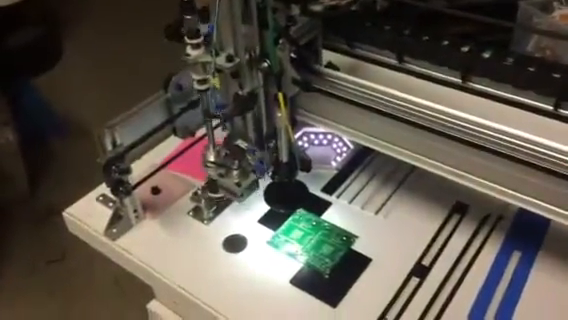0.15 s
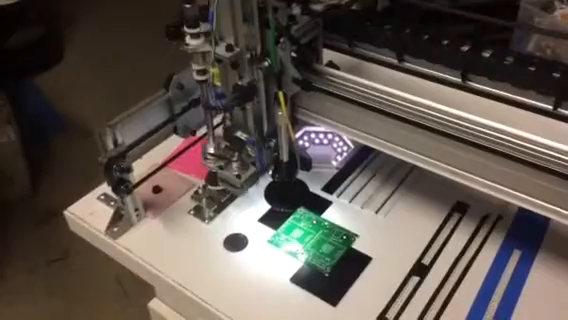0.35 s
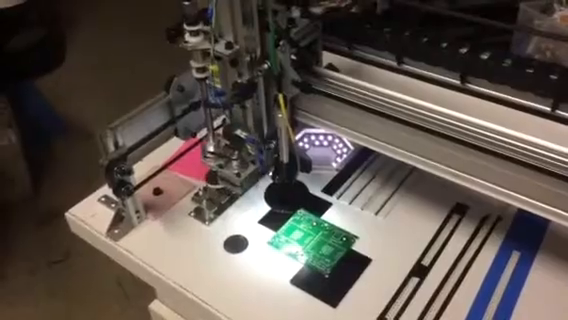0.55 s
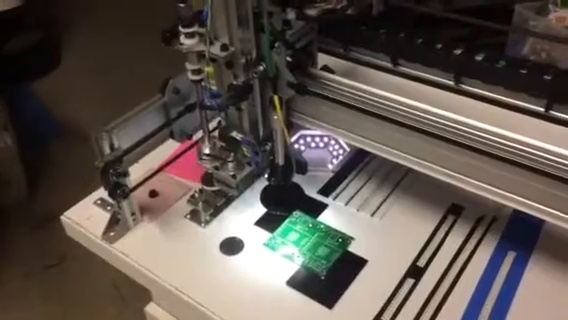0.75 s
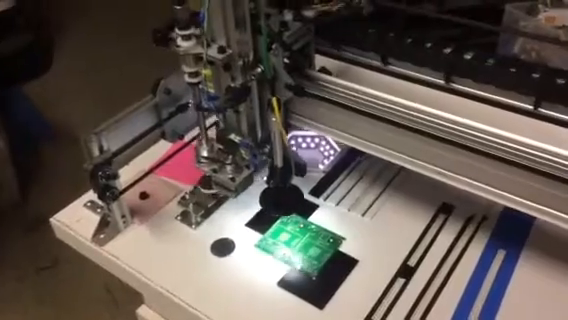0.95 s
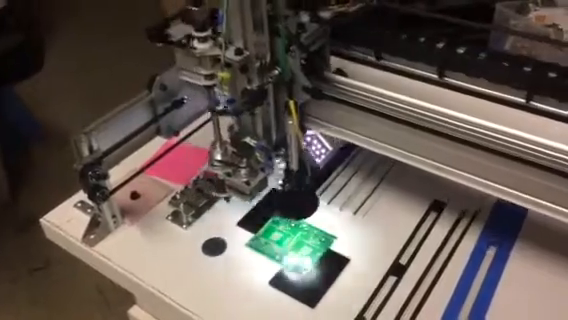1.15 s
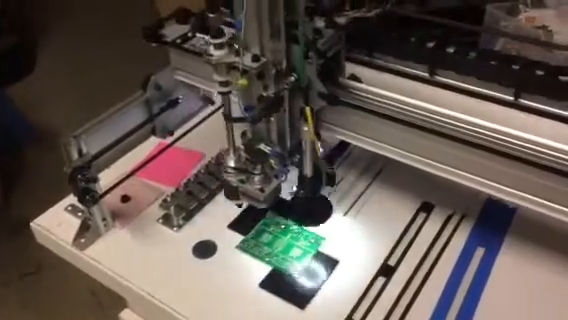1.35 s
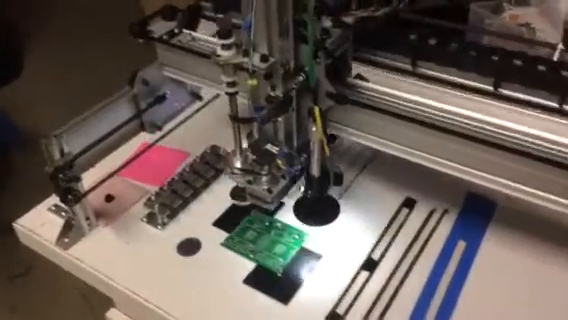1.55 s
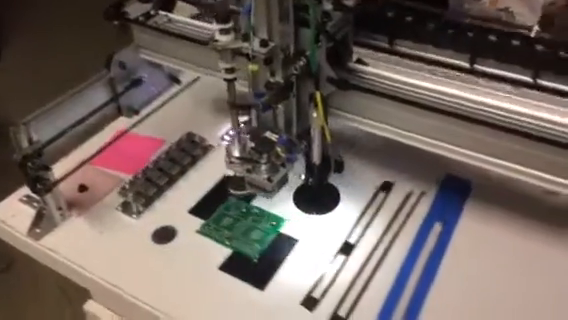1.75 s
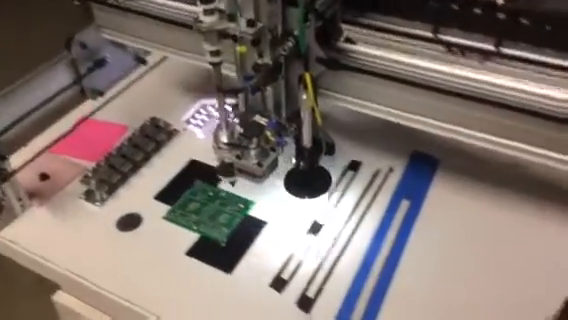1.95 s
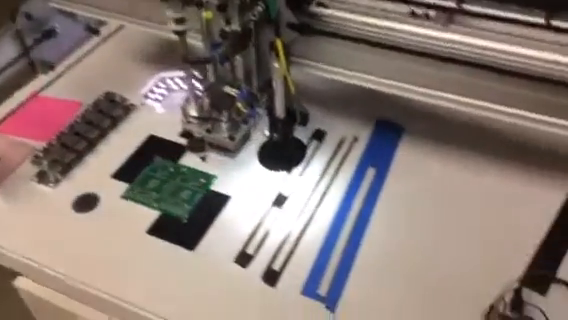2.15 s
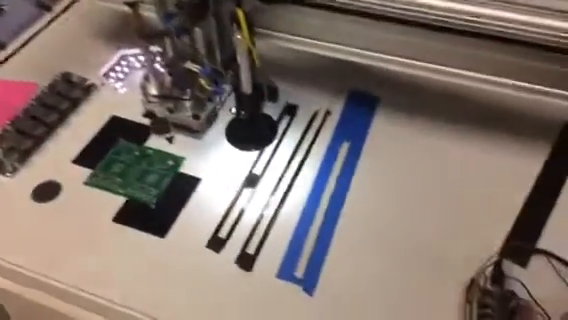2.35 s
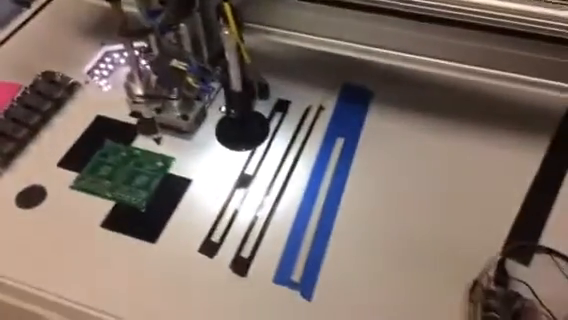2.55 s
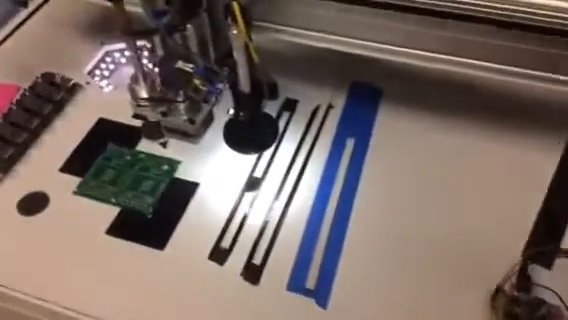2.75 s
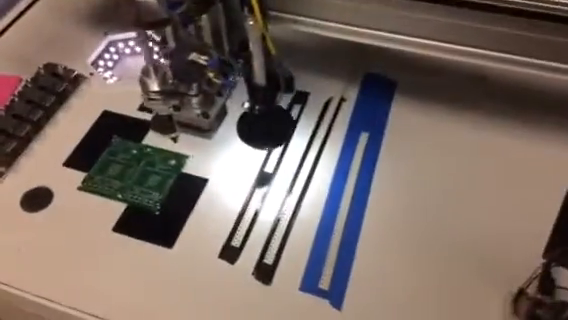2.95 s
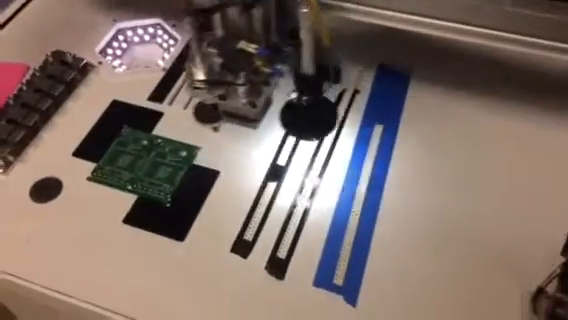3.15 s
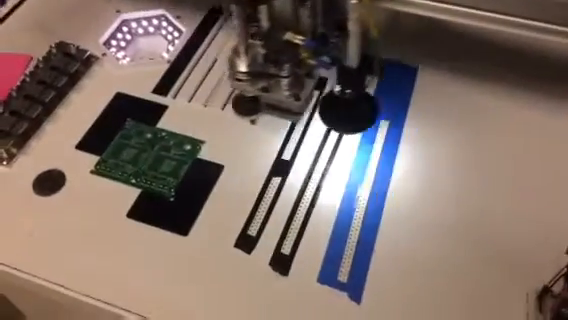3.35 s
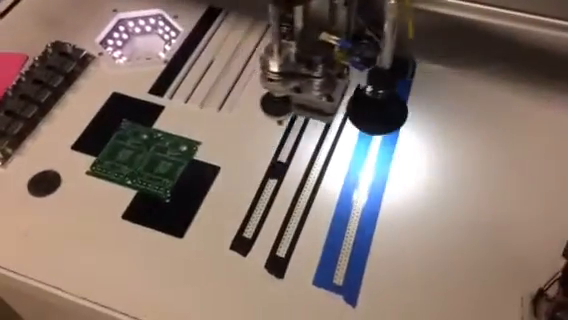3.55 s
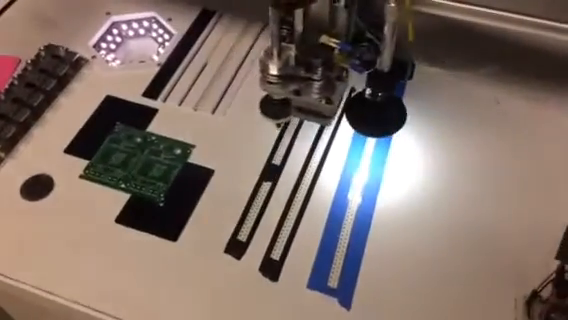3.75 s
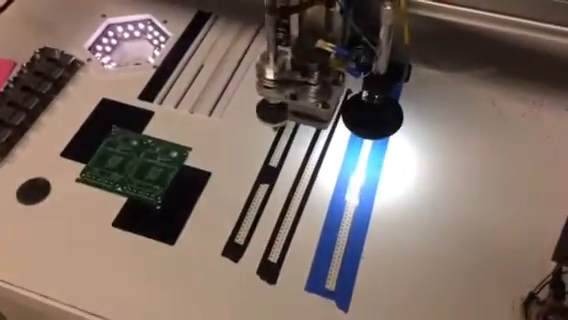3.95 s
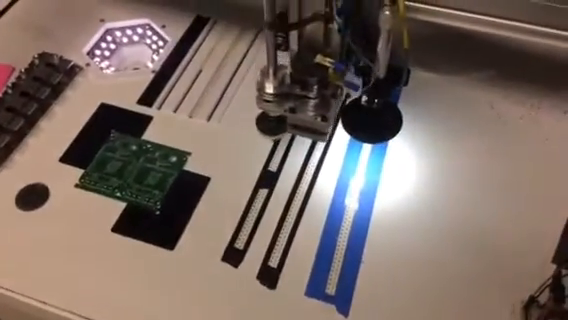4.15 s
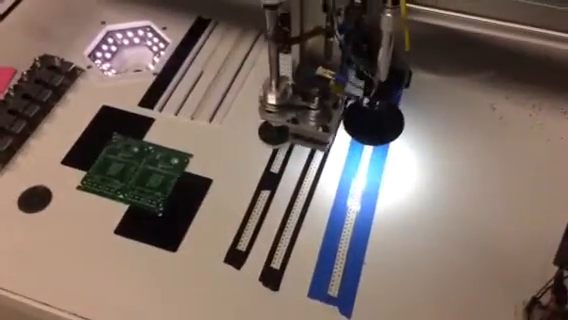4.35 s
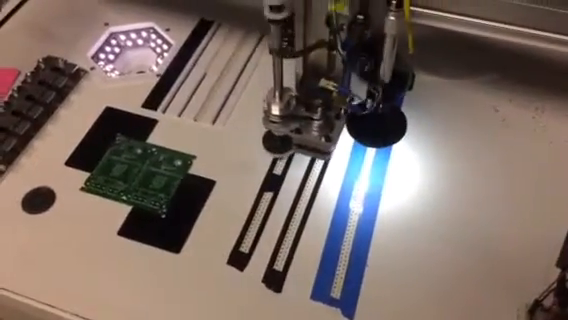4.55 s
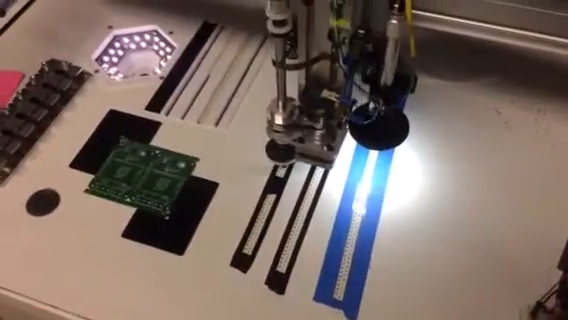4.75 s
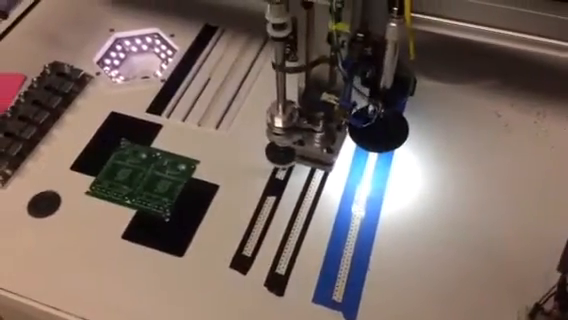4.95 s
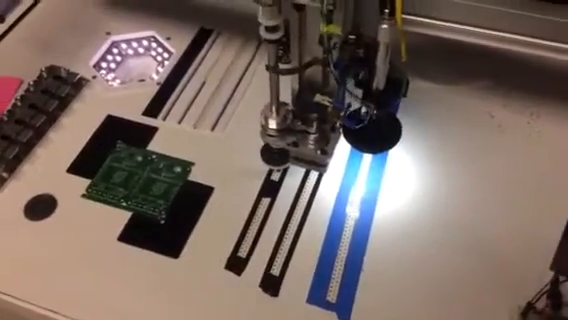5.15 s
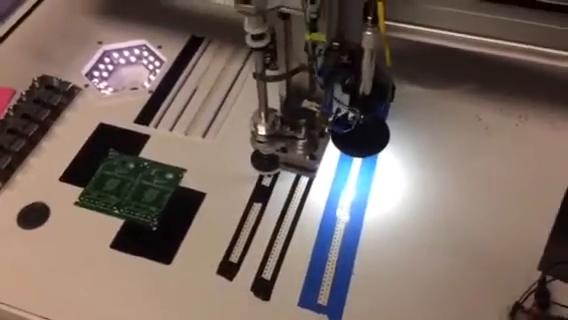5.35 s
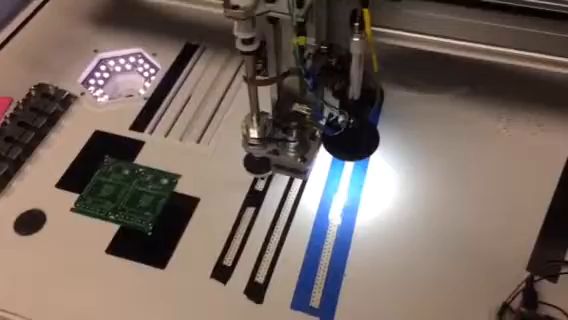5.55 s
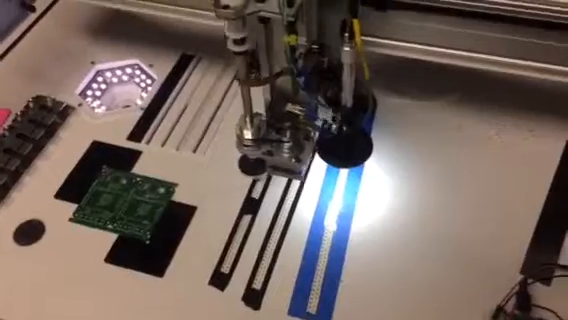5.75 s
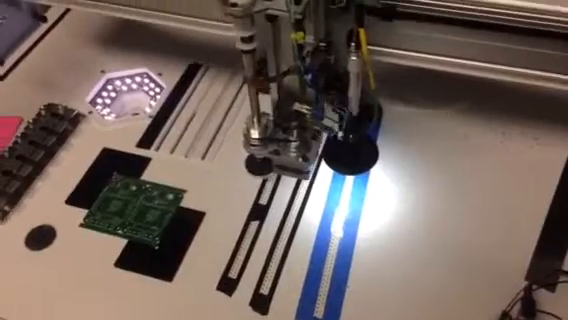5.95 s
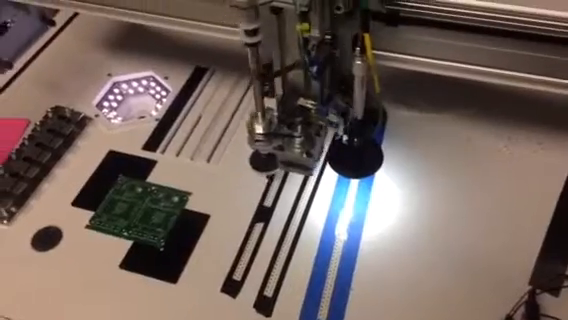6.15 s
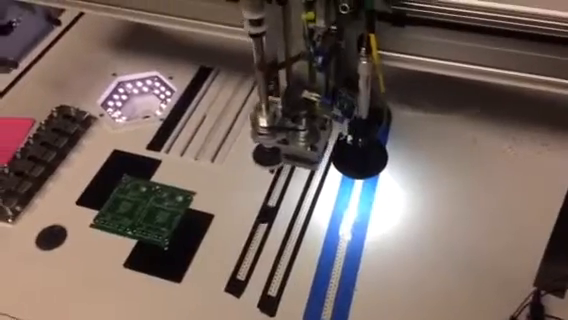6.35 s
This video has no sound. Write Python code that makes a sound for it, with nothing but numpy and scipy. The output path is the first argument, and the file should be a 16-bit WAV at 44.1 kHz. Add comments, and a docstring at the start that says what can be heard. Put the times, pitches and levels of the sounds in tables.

```python
"""Thin electronic whistles over a low room hum, then a pick-and-place machine starts to move.
Its lift and gantry speed up, cruise and brake: motor overtones sing through the frame, with knocks and noise.
Belts drone and motor drivers whistle; late on, a valve snaps, air escapes and a small vacuum pump purrs.
Tones are sums of sine waves; knocks and noise are shaped by resonances or by broad outlines."""
import sys
import numpy as np
from scipy import signal
from scipy.fft import rfft, irfft, next_fast_len
from scipy.io import wavfile
from scipy.ndimage import uniform_filter1d

SR = 44100
rng = np.random.default_rng(int(sys.argv[2]) if len(sys.argv) > 2 else 0)


def dump_mix(stems):
    """Bounce the given channels to the path in sys.argv[1] as a 16-bit WAV at rate SR."""
    frames = np.atleast_2d(stems).T  # one column per channel
    limited = np.clip(frames, -1, 1)  # hard clip at full scale
    pcm = np.round(limited * 32767).astype(np.int16)
    wavfile.write(sys.argv[1], SR, pcm)


N = 286209
T = np.arange(N) / SR  # time of every sample, in seconds

# Motor overtones, before each move's own trims: multiple of step rate (to the nearest quarter),
# level_db at speed, level_db on braking, extra_db under ramp load
LIFT = [(1, -56, -57, 3), (2, -68, -69.5, 3), (3, -70.5, -71.5, -24), (4, -61, -61, -8),
        (5, -66.5, -66.5, -16), (6, -64.5, -61.5, -26), (7, -66, -64, -19), (9, -70, -71, -1.5)]
BRIDGE_A = [(1, -41.5, -39, -5.5), (2, -65.5, -64, 4.5), (3, -74, -69, 16), (4, -84, -49, -4),
            (5, -64, -59, -3), (6, -65, -68, -3), (7, -74, -68, 1), (8, -73, -79, 5), (9, -71, -76, -7),
            (9.25, -74, -73, -23), (9.75, -72, -65, -25), (10.75, -80, -72, -27)]
BRIDGE_B = [(1, -48.5, -43, 0.5), (2, -57.5, -74, -10), (3, -66.5, -65.5, 15.5), (3.25, -59, -70, -16),
            (4, -48, -52.5, -4), (5, -50.5, -62, -17), (6, -59, -66, -12), (7, -67, -66, 4.5),
            (8, -68.5, -76, 0), (9.25, -72, -78, -22), (9.75, -74, -68, -14), (10.75, -72, -80, -13)]
HEAD_A = [(2, -60, -62.5, -6), (5, -70, -78, -11), (5.75, -68, -74, -12), (7, -53.5, -63, -16),
          (8, -60.5, -62, 5.5), (18.2, -73, -64.5, -11), (25.9, -66.5, -70.5, -2)]
HEAD_B = [(1, -70, -69.5, -19), (2, -45, -52.5, 0), (3, -50.5, -51, -21), (4, -60, -64.5, 5),
          (6, -66, -62, -2), (7, -55, -60.5, -21), (8, -52, -55, -0.5), (15, -65, -59, 0),
          (16, -71, -74, -18)]
# Sharp resonances of the gantry frame and of the lift: pitch_hz, width_hz, gain_db
FRAME = [(1176, 108, 2.5), (1580, 72, 2), (4590, 140, -7), (4970, 30, -5), (5280, 62, 1), (6020, 290, -2.5),
         (5600, 130, -15), (6760, 52, -41), (7280, 64, -1.5), (6600, 35, -19), (7460, 37, -4),
         (8240, 94, -6.5), (12700, 110, -42), (14900, 240, -25)]
LIFT_FRAME = [(1067, 69, -1), (3386, 83, -2.5), (4830, 100, -6), (5300, 90, -14.5), (6400, 18, -27),
              (7200, 53, -3.5), (8120, 230, -7.5), (9040, 76, -7.5), (10700, 84, -15.5), (14600, 88, -17)]
RESONANCES = {"lift": LIFT_FRAME, "gantry": FRAME}  # part name: its resonances
# Broad outline under the sharp resonances: pitch_hz, gain_db
FRAME_BASE = [(300, -17), (1000, -8.5), (3000, -14.5), (6000, -11.5), (8800, -16.5), (10000, -30.5),
              (15000, -48)]
# Moves: part, start_s, stop_s, motors, shake_db (start jolt, cruise, stop jolt),
# rush_db and hiss_db (each: speeding up, cruise, braking, holding after).
# Each motor: step_rate_hz, overtones, tone_db, tilt_db per octave, body_db on 2nd to 4th overtone,
# knock_db starting, knock_db braking
MOVES = [("lift", .125, .655, [(1245.9, LIFT, -4.1, 0.1, 7, -61, -60)], (-55, -62, -56),
         (-55, -63, -53, -64), (-56, -66, -56, -72)),
         ("gantry", .92, 2.29, [(1329.6, BRIDGE_A, 0, 0, 0, -47.5, -52),
         (429.1, HEAD_A, 0, 0, 0, -56, -60)], (-36, -55, -41), (-43.5, -53.5, -42, -76),
         (-56, -58.5, -53, -77)), ("gantry", 2.99, 3.82, [(1329.6, BRIDGE_B, 0, 0, 0, -48.5, -49.5),
         (565.6, HEAD_B, 0, 0, 0, -50, -59)], (-38, -48, -38), (-41, -51, -43, -72),
         (-54, -57.5, -55, -77)), ("lift", 4.015, 4.92, [(1249.2, LIFT, 0.3, -0.3, -1.1, -60, -54)],
         (-56, -60.5, -55), (-49, -63, -47, -63), (-54, -65.5, -59, -66)),
         ("lift", 5.595, 6.502, [(1249.2, LIFT, -1.6, 1.3, -7, -56, -68)], (-60, -60, -57),
         (-47, -63, -48, -63), (-57, -62.5, -55, -65))]
# Time to reach speed, and to brake; part name: ramp_s
RAMP_S = {"lift": .105, "gantry": .2}
# Where strain noise peaks in a ramp; part name: share of the ramp's time (0 to 1), sharpness (exponent)
RUSH_PEAK = {"lift": (0.38, 1), "gantry": (0.49, 1.14)}
HISS_PEAK = {"lift": (0.57, 1), "gantry": (0.75, 0.43)}
# Low shaking resonances of the gantry: pitch_hz, width_hz, gain_db
GANTRY_SHAKE = [(195, 29.7, 4.5), (332.4, 67, 7.5), (389.8, 75, 4), (514, 310, -24)]
# Outline of the driver hiss: pitch_hz, relative level_db per Hz
DRIVER_HISS = [(1760, -40.5), (3000, 8), (3190, -34), (3330, -34), (3590, 10), (4790, -32), (5160, -32),
               (7330, 8), (9850, 5), (10300, 4.5), (15500, 0.5)]
# Belt drones: on_s, off_s, pitch_hz, width_hz, level_db (rms)
DRONES = [(0.88, 2.15, 323.2, 7.7, -52.5), (1.114, 2.198, 208, 12.5, -54), (1.69, 2.32, 402.3, 20, -56.5),
          (3.08, 3.816, 180, 8.1, -55.5), (3.13, 3.768, 401.7, 9.2, -48.5), (3.2, 3.8, 342.4, 24, -54.5),
          (4.14, 4.83, 320, 14, -62.5), (.25, 0.57, 400, 8.7, -67.5), (0.16, 0.67, 267.5, 11, -63)]
# Driver whistles: on_s, off_s, pitch_hz, average level_db (rms)
WHISTLES = [(-.1, 1.0, 5510, -65.5), (-.1, .95, 7362, -65.5), (-.1, 1.0, 12870, -70),
            (-.1, .13, 10940, -74), (.22, .58, 14637, -70), (1.12, 2.1, 7200, -60.5),
            (1.122, 2.1, 5460, -60.5), (1.12, 2.1, 5900, -68), (1.12, 2.1, 8650, -64.5),
            (3.81, 4.85, 8010, -76), (3.2, 3.62, 7170, -62), (3.2, 3.62, 7100, -72), (3.2, 3.62, 4807, -75),
            (3.827, 5.6, 5340, -70.5), (3.84, 6.6, 2666, -70.5), (4.1, 6.6, 7326, -74),
            (4.1, 4.83, 14680, -69.5), (4.933, 5.6, 7730, -58.5), (4.934, 5.6, 15068, -73),
            (4.93, 5.6, 11192, -75), (5.7, 6.4, 14800, -72), (5.7, 6.4, 8920, -81)]
# Two close tones: on_s, off_s, swells per second, time of one swell in s
BEAT = (1.14, 2.07, 3.45, 1.625)
# Pump knock overtones: multiple of turn rate, relative level_db
PUMP_ORDERS = [(3, -5), (4, -17.5), (5, -21.5), (6, -15), (7, -19.5), (8, -24), (9, -8.5), (10, -20),
               (11, -16), (12, -13), (13, -15.5), (14, -29), (15, -5.5), (16, -18), (17, -12), (18, -8),
               (19, -17), (20, -14), (21, -10), (22, -22), (23, -12.5), (24, -14.5), (25, -30), (26, -16.5),
               (27, -11.5), (28, -30), (29, -11.5), (30, -15.5), (31, -33), (32, -20), (33, -35), (34, -31),
               (35, -19), (36, -20)]
# Resonances of the pump's air: pitch_hz, width_hz, gain_db
PUMP_AIR = [(594, 550, -4), (1190, 1100, -1), (1990, 210, 1.5), (2660, 460, -10), (3980, 480, -4)]
# Valve strike and bounces: strike_s; and their peak level_db before the bass is removed
VALVE_S = [5.0491, 5.0496, 5.0508, 5.0652]
VALVE_DB = [1, -5.5, -17, -39]
# Ringing of the valve's steel: pitch_hz, relative level_db, t60_s (time to fade by 60 dB)
VALVE_MODES = [(3350, -15, 0.009), (5960, -20, 0.019), (7700, 1.5, 0.0077), (8470, -1.5, 0.0077),
               (11200, 8, 0.0073), (13000, 8, 0.0045)]
# Outline of the room hum: pitch_hz, relative level_db per Hz
HUM_OUTLINE = [(16, -39), (40, -9), (55, -1.5), (70, 4.5), (110, -3), (188, -15.5), (287, -33.5),
               (847, -25), (1260, -30.5), (1400, -28.5), (3090, -35), (3530, -30.5), (4600, -42.5),
               (7800, -44), (8900, -50), (14300, -55), (15500, -45)]

STILL_SHAKE_DB, FIRST_RUSH_DB, FIRST_HISS_DB = -66.5, -67, -69  # shake at rest; noise before the first move
JOLT_S, STOP_JOLT_LEAD_S = 0.033, 0.065  # rise of a jolt; the last one begins before the motor stops
VENT_DB, VENT_T60_S = -47, 0.24  # air escaping after the valve strikes
BEAT_HZ, BEAT_DB = 3990.5, -62  # middle pitch of the two tones; peak level of each
PUMP_ON_S, PUMP_START_DB, PUMP_DB, PUMP_RISE_S = 5.02, -68, -50, 0.069
# The pump slows as vacuum builds (turns per s, s), then creeps back (added turns per s, from and to s)
PUMP_FREE, PUMP_LOADED, PUMP_SAG_S, PUMP_CREEP, PUMP_CREEP_S = 67.6, 62.0, .155, 1.0, (5.6, 6.35)
ROOM_T60_S, ROOM_DB, HUM_DB = 0.23, -15.5, -46


def steppers(flutter_db=0.7, shudder_db=4.0, sweep_share=0.95, scatter_db=3):
    """Motors follow S-shaped speed ramps; overtones swell at resonances, and loaded steps knock the frame."""
    out, grid = np.zeros(N), np.arange(0, 22050., 10)
    for part, start, stop, motors, *_ in MOVES:
        peaks, cruise = RESONANCES[part], (start + RAMP_S[part], stop - RAMP_S[part])
        gain = frame(grid, peaks)
        a, b = int(start * SR), min(int(stop * SR), N)
        t = T[a:b]
        u = progress(part, start, stop, t)
        load = np.minimum(6 * (1 - u), 1)
        for step_hz, overtones, tone_db, tilt_db, body_db, *knock_db in motors:
            rate = step_hz * u * u * (3 - 2 * u)
            steps = np.cumsum(rate) / SR
            # under load the rotor swings about its step, which smears the high overtones most
            rotor = steps + .026 * load * walk(250, b - a)
            thrust = (rate / step_hz) ** .7  # slow steps sing softly
            for k, early_db, late_db, ramp_db in overtones:
                k = round(4 * k) / 4  # multiples are kept to the nearest quarter
                gain_now = np.interp(k * rate, grid, gain)
                gain_at_speed = np.interp(k * step_hz, grid, gain)
                swell = (gain_now / gain_at_speed) ** sweep_share
                db = np.interp(t, cruise, (early_db, late_db)) + tone_db + tilt_db * np.log2(k)
                db += flutter_db * walk(9.58, b - a)
                db += body_db * (2 <= k <= 4)
                db += load * (ramp_db + shudder_db * walk(90.05, b - a))
                tone = np.sqrt(2) * np.sin(2 * np.pi * (k * rotor + rng.random()))
                out[a:b] += undb(db) * swell * thrust * tone
            step_clicks = np.diff(np.floor(steps), prepend=0)
            knocks = step_clicks * undb(scatter_db * rng.standard_normal(b - a)) * load
            ring = colour(knocks, lambda hz: modes(peaks, hz))
            ramp_rms = np.sqrt(np.mean(ring[u < 1] ** 2))
            out[a:b] += ring / ramp_rms * undb(np.interp(t, cruise, knock_db))
    return out


def progress(part, start, stop, t):
    """Ramp position of a move: 0 at rest, 1 at full speed."""
    return np.clip(np.minimum(t - start, stop - t) / RAMP_S[part], 0, 1)


def running():
    """The gantry shakes in its low modes, belts and bearings rush through the moving part, drivers hiss."""
    shake = unit(colour(rng.standard_normal(N), lambda hz: modes(GANTRY_SHAKE, hz)))
    grit = rng.standard_normal(N) * undb(2.9 * walk(200))
    gantry_rush = unit(colour(grit, frame))
    lift_rush = unit(colour(grit, lambda hz: frame(hz, LIFT_FRAME)))
    travel = gate(.85, 3.95, .05)  # the gantry's share of the time
    rush = travel * gantry_rush + (1 - travel) * lift_rush
    hiss = unit(colour(rng.standard_normal(N), lambda hz: slope(DRIVER_HISS, hz)))
    vent = (T > VALVE_S[0]) * undb(VENT_DB - 60 * np.abs(T - VALVE_S[0]) / VENT_T60_S)
    rush_gain = np.hypot(effort(column=2, held_db=FIRST_RUSH_DB, peak=RUSH_PEAK), vent)
    # columns count from MOVES' fourth entry, the motors
    hiss_gain = effort(column=3, held_db=FIRST_HISS_DB, peak=HISS_PEAK)
    return jolts() * shake + rush_gain * rush + hiss_gain * hiss


def effort(column, held_db, peak):
    """Noise gain: a holding level at rest, a cruise level at speed, and a swell of strain on every ramp."""
    times, levels, strain = [], [], np.zeros(N)
    for part, start, stop, *rest in MOVES:
        up_db, cruise_db, down_db, after_db = rest[column]
        times += [start, start + RAMP_S[part], stop - RAMP_S[part], stop]
        levels += [held_db, cruise_db, cruise_db, after_db]
        held_db = after_db
        share, sharpness = peak[part]
        u = progress(part, start, stop, T) ** (np.log(.5) / np.log(share))  # 0.5 where strain peaks
        ramp_db = np.where(T < (start + stop) / 2, up_db, down_db)
        strain += (4 * u * (1 - u)) ** sharpness * undb(ramp_db)
    return np.hypot(undb(np.interp(T, times, levels)), strain)


def jolts():
    """Shake gain: a jolt as each move starts and stops, a steady shake in between."""
    def pulse(s):
        """A jolt rises to 1 in JOLT_S, then dies away."""
        age = np.maximum(T - s, 0) / JOLT_S
        return age * np.exp(1 - age)

    power = undb(STILL_SHAKE_DB) ** 2
    for part, start, stop, _, (start_db, cruise_db, stop_db), *_ in MOVES:
        power = power + (undb(start_db) * pulse(start)) ** 2
        power = power + (undb(stop_db) * pulse(stop - STOP_JOLT_LEAD_S)) ** 2
        power = power + (undb(cruise_db) * progress(part, start, stop, T)) ** 2
    return np.sqrt(power)


def drones(edge_s=0.024):
    """Belts flutter near their own pitch: noise through a narrow resonance makes unsteady tones."""
    out = np.zeros(N)
    for on, off, hz, width, db in DRONES:
        tone = unit(colour(rng.standard_normal(N), lambda f: modes([(hz, width, 0)], f) ** 2))
        out += gate(on, off, edge_s) * undb(db) * tone
    return out


def whistles(edge_s=0.0046, flutter_db=1.5):
    """Motor drivers chop their current: fixed pitches with slightly wavering levels, switched by the table."""
    out = np.zeros(N)
    for on, off, hz, db in WHISTLES:
        span = slice(max(int(on * SR), 0), int(off * SR))
        t = T[span]
        level = undb(db + flutter_db * walk(9.1, len(t)))
        tone = np.sqrt(2) * np.sin(2 * np.pi * (hz * t + rng.random()))
        out[span] += gate(on, off, edge_s)[span] * level * tone
    return out


def beat():
    """Two tones a few hertz apart swell and cancel."""
    on, off, rate, swell_s = BEAT
    swell = 2 * np.cos(np.pi * rate * (T - swell_s))
    return gate(on, off, .03) * undb(BEAT_DB) * swell * np.sin(2 * np.pi * BEAT_HZ * T)


def valve(crack_db=-9, crack_s=0.0003):
    """The plunger strikes its seat and bounces: short steel modes ring with a crack of noise."""
    out, t = np.zeros(N), T[:SR // 20]
    ring = np.zeros(len(t))
    for hz, db, t60 in VALVE_MODES:
        ring += undb(db) * np.exp(-np.log(1000) * t / t60) * np.sin(2 * np.pi * hz * t)
    for s, db in zip(VALVE_S, VALVE_DB):
        crack = rng.standard_normal(len(t)) * np.exp(-t / crack_s)
        hit = ring / np.abs(ring).max() + undb(crack_db) * crack / np.abs(crack).max()
        out[int(s * SR):int(s * SR) + len(t)] += undb(db) * hit / np.abs(hit).max()
    return out


def pump(air_db=-12, tick_db=-14, tick_hz=4750, weak_db=-12, puff_turns=0.51, stroke=0.57, flutter_db=3.0):
    """Flaps knock in step with the turning, air puffs three times a turn, a reed ticks hardest once a turn."""
    age = np.maximum(T - PUMP_ON_S, 0)
    speed = PUMP_LOADED + (PUMP_FREE - PUMP_LOADED) * np.exp(-age / PUMP_SAG_S)
    speed += np.interp(T, PUMP_CREEP_S, (0, PUMP_CREEP))
    turns = np.cumsum(speed) / SR
    db = PUMP_DB + (PUMP_START_DB - PUMP_DB) * np.exp(-age / PUMP_RISE_S)

    a = int(PUMP_ON_S * SR)
    tones = np.zeros(N - a)
    for k, order_db in PUMP_ORDERS:
        level = undb(order_db + flutter_db * walk(6.39, N - a))
        tones += level * np.cos(2 * np.pi * k * turns[a:])
    knocks = np.zeros(N)
    knocks[a:] = -unit(tones)

    thirds = turns % (1 / 3)
    puff_gain = np.exp(-thirds / puff_turns - stroke * (turns % 1))
    puffs = colour(puff_gain * rng.standard_normal(N), lambda hz: modes(PUMP_AIR, hz))

    once, thrice = (np.diff(np.floor(k * turns), prepend=0) for k in (1, 3))
    flaps = (once + undb(weak_db) * thrice) * undb(1.6 * rng.standard_normal(N))
    ticks = colour(flaps, lambda hz: modes([(tick_hz, 500, 0)], hz) ** 2)

    mix = knocks + undb(air_db) * unit(puffs) + undb(tick_db) * unit(ticks)
    return mix * undb(db) * gate(PUMP_ON_S, 7, 0.028)


def room(x):
    """Table top and walls return a short diffuse tail, made of fading noise."""
    t = T[:SR // 2]
    onset = np.clip((t - .002) / .005, 0, 1)
    tail = rng.standard_normal(len(t)) * np.exp(-np.log(1000) * t / ROOM_T60_S) * onset
    return undb(ROOM_DB) * signal.fftconvolve(x, tail / np.sqrt(np.sum(tail ** 2)))[:N]


def hum(waver_db=2.5):
    """Ventilation rumble and distant hiss: shaped noise whose bass wavers in level."""
    air = undb(HUM_DB) * unit(colour(rng.standard_normal(N), lambda hz: slope(HUM_OUTLINE, hz)))
    bass = colour(air, lambda hz: 1 / (1 + (hz / 140) ** 4))
    return air - bass + undb(-0.15 + waver_db * walk(5)) * bass


def undb(db):
    """Turn decibels into a plain gain."""
    return 10 ** (np.asarray(db) / 20)


def unit(x):
    """Scale a sound to an rms level of 1."""
    return x / np.sqrt(np.mean(x ** 2))


def slope(points, hz):
    """Gain of a (pitch_hz, level_db) outline, joined along a logarithmic pitch scale."""
    f, db = np.transpose(points)
    return undb(np.interp(np.log(np.maximum(hz, 1)), np.log(f), db))


def modes(table, hz):
    """Complex response of resonances with alternating sign."""
    total = 0
    for k, (f, width, db) in enumerate(table):
        damping = 1j * hz * width
        total = total + (-1) ** k * undb(db) * damping / (f ** 2 - hz ** 2 + damping)
    return total


def frame(hz, peaks=FRAME):
    """Gain of the frame: sharp resonances on a broad outline."""
    return np.hypot(np.abs(modes(peaks, hz)), slope(FRAME_BASE, hz))


def colour(x, response):
    """Filter a sound by multiplying its spectrum with a response."""
    size = next_fast_len(len(x) + SR // 2)
    hz = np.arange(size // 2 + 1) * SR / size
    return irfft(rfft(x, size) * response(hz), size)[:len(x)]


def walk(rate, size=N):
    """Smooth random drift: levels held for 1 / rate seconds, averaged twice, with a spread near 1."""
    k = int(SR / rate)
    held = np.repeat(rng.standard_normal(size // k + 1), k)
    return 1.3 * uniform_filter1d(uniform_filter1d(held, k), k)[:size]


def gate(on, off, edge_s):
    """Fade in after on and out before off, in straight lines."""
    return np.clip(np.minimum(T - on, off - T) / edge_s, 0, 1)


def scene():
    """Add all the sources into one channel; only the valve snap gets a room tail."""
    # a small steel part radiates almost no bass
    snap = signal.sosfilt(signal.butter(4, 5000, "high", fs=SR, output="sos"), valve())
    machine = steppers() + running() + drones() + whistles() + beat()
    return (machine + snap + pump() + room(snap) + hum())[None]


def record(dry):
    """Weaken the bass below 42 Hz and cut the treble steeply above 15400 Hz."""
    dry = signal.sosfilt(signal.butter(2, 42, "high", fs=SR, output="sos"), dry)
    return signal.sosfilt(signal.ellip(10, .2, 60, 15400, fs=SR, output="sos"), dry)


dry = scene()
out = record(dry)
dump_mix(out)
```